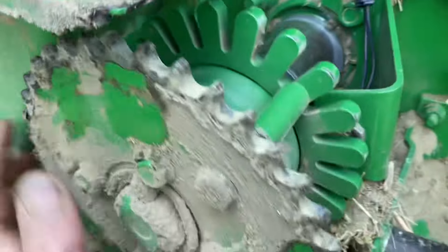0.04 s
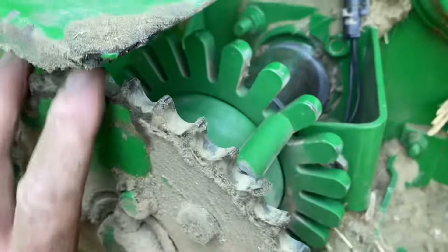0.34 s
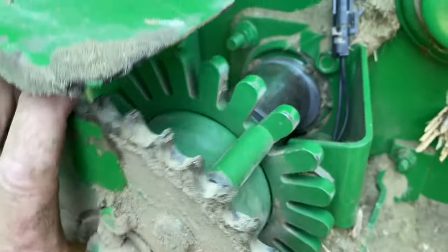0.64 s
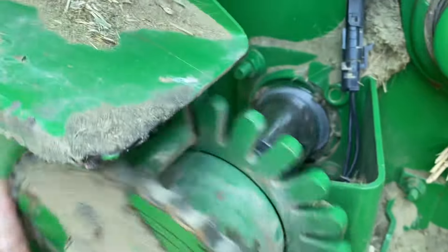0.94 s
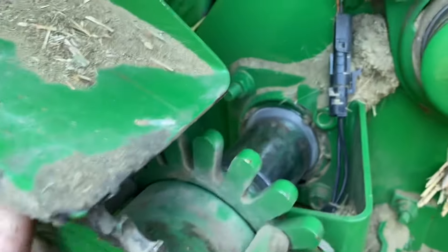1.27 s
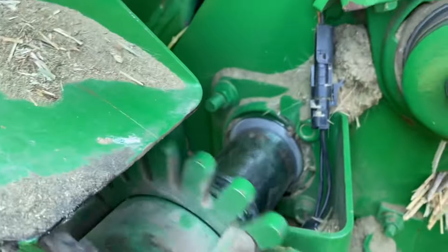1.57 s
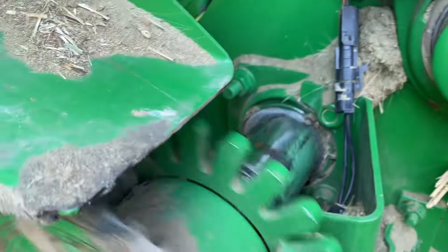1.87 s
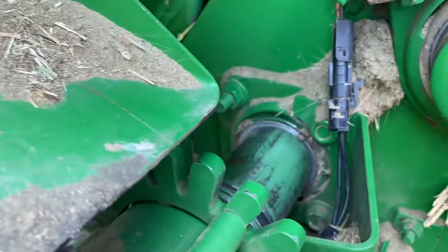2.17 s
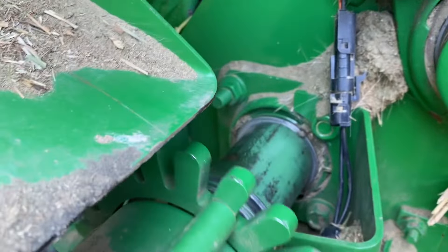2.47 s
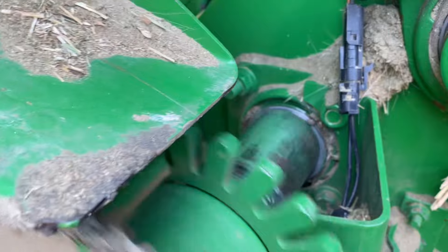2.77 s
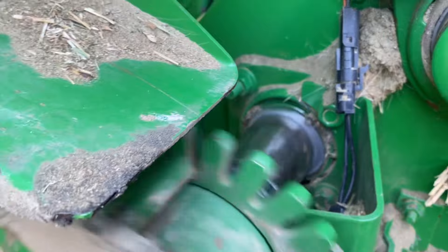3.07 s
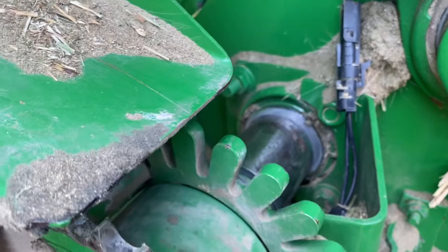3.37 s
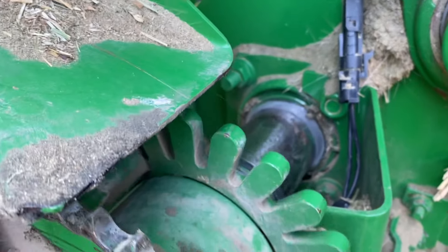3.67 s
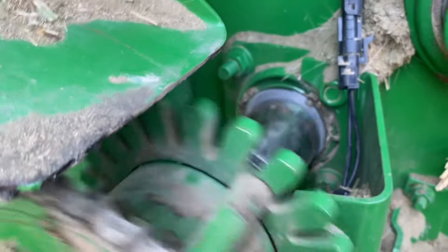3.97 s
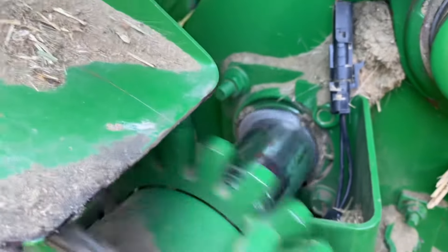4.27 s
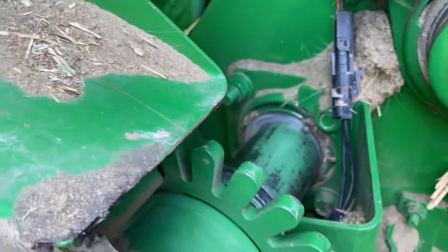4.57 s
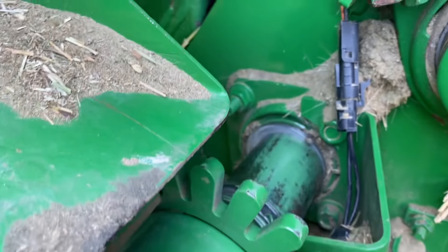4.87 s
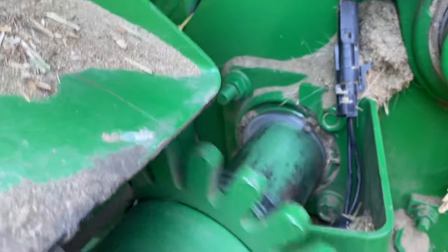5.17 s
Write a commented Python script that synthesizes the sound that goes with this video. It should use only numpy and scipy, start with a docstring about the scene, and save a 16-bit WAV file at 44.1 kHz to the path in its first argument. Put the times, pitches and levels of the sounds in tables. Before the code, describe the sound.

Dull taps and a light rub of skin on dusty steel open the sound, with the microphone right beside a farm machine in a quiet yard. A sprocket is then pushed back and forth by hand, and its rough bearing growls in five surges, coasting lower between them. Short steel clacks and fine grit accompany the turning, thin panels ring faintly, and the fourth surge brings two sharp metallic knocks.

```python
"""Soft hand bumps and rubbing, then a heavy rumble that swells five times, very close: a sprocket on a
farm machine is gripped and swung to and fro by hand. Its worn bearing growls through the steel housing,
louder and grittier with speed, while the frame shudders and thin guard panels sing on. Loose parts
clack as it turns, and two sharp knocks land in the fourth, hardest swing. Faint yard air lies behind."""
import sys
import numpy as np
from scipy import signal
from scipy.fft import rfft, irfft
from scipy.io import wavfile
from scipy.ndimage import uniform_filter1d

SR = 44100
rng = np.random.default_rng(int(sys.argv[2]) if len(sys.argv) > 2 else 0)


def persist_wave(psi):
    """Save psi, clipped to +-1, as 16-bit WAV."""
    counts = np.round(np.clip(psi, -1, 1) * 32767).astype(np.int16)
    wavfile.write(sys.argv[1], SR, np.atleast_2d(counts).T)


N = 234557

# Swings of the sprocket. Each row: start, speed-up, hold and slow-down in seconds, top speed from 0 to 1,
# share of that speed left for coasting, extra drone in dB, extra grit in dB.
SWINGS = [(0.658, .19, 0.18, 0.27, .53, 0.38, -3, 5), (1.542, 0.18, 0.13, 0.27, 0.94, .3, 1, -1),
          (2.523, 0.44, 0.07, .21, 1, .3, 2, -14), (3.819, 0.24, 0.33, 0.19, 0.94, 0.4, 0.5, -1.5),
          (5.106, .15, 0.088, .2, 0.78, 0.41, -5.5, -2.5)]
# Ring of the loose steel parts. Each row: pitch in Hz, level in dB, time to fall 60 dB in seconds.
STEEL_MODES = [(633, 3, 0.074), (1166, -5, 0.081), (1943, -4, 0.099), (2067, -7.5, 0.067),
               (2875, -10.5, 0.09), (3170, -14.5, 0.12), (3456, -11, 0.095), (3880, -11.5, 0.063),
               (4576, -4.5, 0.042), (4864, -5.5, 0.082), (5260, -9.5, 0.038), (6610, -22, 0.035),
               (7540, -8, 0.039)]
# Tone of a dry crack on steel. Each row: frequency in Hz, gain in dB.
CRACK_EQ = [(500, 2.5), (1500, -0.5), (3500, -3.5), (5200, -0.5), (5800, -4), (7200, 1.5), (9000, -9),
            (11500, -3.5), (15500, -8)]


def bearing(speed):
    """Balls drop into pits of the race, faster and harder with speed, shaking the housing and panels."""
    # Low and middle resonances of the housing, then the guard panels that sing on after a swing.
    # Each row: pitch in Hz, width in Hz, gain in dB.
    drone_modes = [(132.4, 27, 8.5), (146.4, 34, -11.5), (123, 14, -14.5), (200.8, 5.3, -16)]
    growl_modes = [(241, 36, -17.5), (292.7, 9.1, 0.5), (345.3, 5.2, 1), (395.8, 15, 5.5),
                   (463.5, 33, -7.5), (504.2, 34, -2), (573, 20, -2), (651.5, 10, 4), (659, 54, -1.5),
                   (730, 12, 2.5), (745, 6.8, 2), (825, 6.3, 9.5), (912, 16, -18), (984, 7.5, -13.5),
                   (1083, 34, 0.5), (1138, 14, 5.5), (1201, 10, 6.5), (1322, 39, -0.5), (1373, 21.5, 0.5),
                   (1479, 17, 0.5), (1723, 19, 3.5)]
    panel_modes = [(301.5, 3, -7), (813, 2, 0), (852, 2.5, 0), (905, 3, -4), (948, 2, 1), (954, 2, 1),
                   (1042, 2, -8)]
    # Broad body of the growl. Each row: frequency in Hz, gain in dB.
    body_eq = [(100, -19), (190, -20), (260, 8), (400, 6.5), (480, -8), (750, -6.5), (1050, -14.5),
               (1500, -50.5), (2200, -23), (4000, -69.5)]
    t = np.arange(N) / SR
    pits_per_s = 250 + 1200 * speed
    pits = impacts(pits_per_s, spread_db=0)

    lagged_speed = np.interp(t - .03, t, speed)  # the housing takes a moment to build up
    extra_drone_db, _ = swing_accents()
    drone_db = speed_db(lagged_speed, full_db=-31.5, tenfold_db=31.6) + extra_drone_db
    drone = resonate(stereo(pits, side_db=-13, left_db=-.8), drone_modes)
    drone = steady(resonate(drone, [(140, 150, 0)]), span=.07) * amp(drone_db)

    # the bass sits near the centre, the mids spread wider
    side = colour(pits[1:], [(200, -13.5), (700, -2.5)])[0]
    blows = stereo([pits[0], side], side_db=1.5, left_db=1.5)
    dull_blows = colour(blows, [(100, -29), (230, 14.5), (1600, -17), (2600, -24.5)])
    housing = unit(resonate(dull_blows, growl_modes))
    body = unit(colour(stereo(impacts(pits_per_s, spread_db=3), side_db=-21, left_db=-1.5), body_eq))
    growl_db = speed_db(speed, full_db=-38, tenfold_db=42.9)
    growl = steady(housing + speed ** .22 * body, span=.08) * amp(growl_db)
    # the growl sounds duller above about 1 kHz when the sprocket turns slowly
    lows = signal.sosfiltfilt(signal.butter(8, 1050, fs=SR, output="sos"), growl)
    growl = lows + (.41 + .65 * speed) * (growl - lows)

    panels = resonate(blows * amp(growl_db / 2), panel_modes)
    panels = unit(resonate(panels, [(896, 500, -19.5), (305, 80, 29)]))
    turning = np.interp(t, [.62, .76], [.25, 1])  # until the first swing it is only being gripped
    return turning * (drone + growl) + amp(-66.5) * panels


def pushed_speed(creep=.091):
    """Each swing speeds the sprocket up, holds it and brakes it; in between it barely creeps."""
    swings = [top * swell(start, rise, hold, fall) for start, rise, hold, fall, top, *_ in SWINGS]
    return np.maximum(creep, np.max(swings, axis=0))


def coasting_speed(decay_s=1.):
    """After each swing the sprocket runs on slowly and dies away."""
    t, speed = np.arange(N) / SR, 0
    for start, rise, hold, _, top, share, *_ in SWINGS:
        since = t - start - rise - hold
        speed = np.maximum(speed, top * share * (since > 0) * np.exp(-np.abs(since) / decay_s))
    return speed


def swing_accents():
    """Extra drone and grit in dB, gliding from one swing to the next."""
    start, rise, *_, drone_db, grit_db = np.transpose(SWINGS)
    return [np.interp(np.arange(N) / SR, start + rise, db) for db in (drone_db, grit_db)]


def frame(speed):
    """The heavy frame trembles under the moving mass and shudders at every shove."""
    # The hand shoves or catches the sprocket. Each row: start in seconds, hold in seconds, level in dB.
    shoves = [(0.013, 0.1, -36), (0.537, 0.022, -42), (1.636, 0.34, -35), (2.235, 0.16, -49),
              (2.694, 0.033, -41), (2.943, 0.058, -37.5), (3.176, 0.19, -41.5), (3.685, 0.15, -38.5),
              (3.865, 0.073, -27), (4.21, 0.16, -30), (4.447, 0.016, -35.5), (4.717, 0.37, -42),
              (5.092, .2, -38.5)]
    # Deep tone of the frame. Each row: frequency in Hz, gain in dB.
    frame_eq = [(10, -51.5), (28, -28), (42, -9), (58, 2), (70, -2), (84, 4.5), (100, -3.5), (125, -16),
                (200, -20), (400, -71.5)]
    jolt_power = sum((amp(db) * swell(start, .024, hold, fall=.19)) ** 2 for start, hold, db in shoves)
    tremor = amp(speed_db(speed, full_db=-48, tenfold_db=8.1))
    shake = colour(stereo(rng.standard_normal((2, N)), side_db=-16, left_db=0), frame_eq)
    return steady(shake, span=.099) * np.sqrt(jolt_power + tremor ** 2)


def knocks():
    """Parts scrape together, meet with a thud and give a bright ring that is choked as they close."""
    # Each row: time in seconds, relative thud and ring levels in dB, pitch of the ring as a ratio.
    hits = [(4.222, -14.8, -18, 1.0), (4.4046, -17.8, -21.8, 1.012)]
    # The bright ring. Each row: pitch in Hz, level in dB, time to fall 60 dB in seconds.
    ring_modes = [(2778, 0, .047), (2600, -6, .018), (2380, -11, .018), (3360, -9, .042), (3930, -18, .012),
                  (1760, -7, .014), (7560, -29, .06), (8500, -18, .05)]
    out, t = np.zeros((2, N)), np.arange(SR // 10) / SR
    for start, thud_db, ring_db, pitch in hits:
        scrape = unit(resonate(rng.standard_normal(len(t)), [(3320, 320, .46), (7900, 100, -2.6)]))
        lead_in = np.exp((t - t[-1]) / .018)
        add(out, start - t[-1], amp(-47.5) * scrape * lead_in)
        thud = (-push(t, hz=704, cycles=.95) + .6 * push(t, hz=1254, cycles=.84)
                + .31 * push(t, hz=2330, cycles=.94))
        choked = (1 - np.exp(-t / .0006)) / (1 + (t / .013) ** 8)
        bright = ring(t * pitch, ring_modes, detune=.002) * choked
        knock = amp(thud_db - 2) * thud + amp(ring_db - 3) * bright
        phase_lead = -signal.hilbert(knock).imag  # the near ear hears it a little ahead of the far one
        add(out, start, stereo([knock, phase_lead], side_db=-6, left_db=4))
    return out


def clacks():
    """A loose part slides over its play and chatters to rest, ringing the steel around it."""
    # Each row: time in seconds, relative level in dB, gains of the low and the high ring in dB.
    hits = [(0.551, -67, -11, -2), (0.9504, -31, -6, 2), (0.9652, -26.5, -0.5, 3.5),
            (1.112, -47.5, 4.5, -17), (1.6502, -51, 2.5, 10.5), (1.695, -45, 5, 1),
            (1.7185, -28.5, -2.5, 1.5), (1.9666, -29.5, -5.5, -1.5), (2.303, -58, -23, -14),
            (2.8653, -31.5, 3, 0.5), (2.9387, -40.5, 4, -1), (3.1152, -32.5, 2, 1.5), (3.1294, -41, 10, -6),
            (3.5867, -49, -23, -21), (3.8608, -46, -10, -13), (3.953, -37, -10, -22),
            (4.0656, -30.5, -5.5, -1), (4.2904, -31.5, 0, 5), (4.565, -58, -7, -11),
            (4.6254, -56, -18, -17), (4.776, -66, 1.5, -8), (5.2106, -30, 0.5, -1), (5.276, -50.5, 1, 0)]
    out, t = np.zeros((2, N)), np.arange(SR // 6) / SR
    chatter = (1 - np.exp(-t / .0021)) * (np.exp(-t / .0062) + .056 * np.exp(-t / .069))
    build_up = 1 - np.exp(-t / .002)
    for start, db, low_db, high_db in hits:
        noise = stereo(rng.standard_normal((2, len(t))), side_db=-10.5, left_db=0)
        crack = colour(noise * chatter, CRACK_EQ)
        # each blow lands elsewhere and favours other modes
        modes = [(hz, mode_db + (low_db if hz < 2500 else high_db) + 2.5 * rng.standard_normal(), t60)
                 for hz, mode_db, t60 in STEEL_MODES]
        steel = stereo([ring(t, modes, detune=.002), ring(t, modes, detune=.006)], side_db=-8, left_db=3)
        add(out, start, amp(db) * (amp(-2.5) * crack + amp(-12.5) * steel * build_up))
    return out


def hand_bumps():
    """Flesh meets something solid: a dull tap, and a boom that is deeper the softer the contact."""
    # Each row: time in seconds, relative boom and tap levels in dB, tap pitch in Hz.
    bumps = [(0.004, -37, -39.5, 222), (0.027, -40, -40, 280), (0.061, -32, -26, 310),
             (0.072, -20.5, -26.5, 318), (0.0868, -27, -22, 365), (0.097, -47, -23, 343),
             (0.108, -29, -28, 182), (0.12, -29, -32, 218), (0.164, -32, -27, 220),
             (0.202, -42, -31.5, 220), (0.21, -23, -32.5, 298), (0.222, -29.5, -33.5, 250),
             (0.318, -42, -46, 264), (0.422, -60, -40.5, 257), (0.431, -51, -42, 275),
             (0.601, -45, -48.5, 230), (0.619, -45, -46, 192), (2.184, -58, -37.5, 144),
             (3.751, -30.5, -40, 150), (3.802, -31, -38.5, 157), (4.136, -22, -45.5, 140),
             (4.3, -52, -25.5, 360), (4.314, -17.5, -36, 142), (4.713, -31, -40.5, 173),
             (5.278, -34, -34, 430)]
    # The frame booms for a moment. Each row: pitch in Hz, width in Hz, gain in dB.
    boom_modes = [(114.8, 30, 5.5), (286, 17, -8.5)]
    out, t = np.zeros((2, N)), np.arange(SR // 8) / SR
    for start, boom_db, tap_db, tap_hz in bumps:
        boom = amp(boom_db - 1) * push(t, hz=.55 * tap_hz, cycles=.69)
        tap = amp(tap_db + 5) * push(t, hz=tap_hz, cycles=.85)
        add(out, start, boom + tap)
    out += resonate(out, boom_modes)
    return colour(out, [(20, -8), (50, 5), (130, -1), (800, -4.5), (1300, -9.5)])


def friction(speed):
    """Dirt crackles in the race and scrapes the steel, and skin rubs with a fine hiss."""
    # Tone of the dirt and of the skin. Each row: frequency in Hz, gain in dB.
    grit_eq = [(700, 13.5), (1400, 16), (2000, 11.5), (2600, 14.5), (3400, 11.5), (4200, 9.5), (5000, -17),
               (5800, -6.5), (7200, -11.5), (9000, -46), (16000, -27)]
    skin_eq = [(1000, -15), (3000, -9), (5500, -7), (7200, -1.5), (9000, -9), (11500, 1), (13000, -3),
               (15500, 0.5)]
    grit_gain, hiss_gain = friction_gains(speed)
    grit = unit(colour(stereo(impacts(5000, spread_db=-2.5), side_db=-1, left_db=1.5), grit_eq))
    drag = stereo(impacts(810, spread_db=-2.5), side_db=-11.5, left_db=7)
    # the contact wanders, so each bright resonance catches in its own short spells
    scrape = sum(resonate(drag * amp(5 * waver(30)), [(hz, 120, 0)]) for hz, _, _ in STEEL_MODES[2:])
    hiss = unit(colour(stereo(impacts(7000, spread_db=-2), side_db=-11, left_db=.2), skin_eq))
    dirt = amp(-1.5) * grit + amp(-7) * unit(scrape) + amp(-14.5) * grain_ticks(count=160)
    return grit_gain * dirt + hiss_gain * amp(6) * hiss


def friction_gains(speed):
    """Grit and hiss grow with speed and with each stroke of the hand; the hiss also flutters."""
    # Skin strokes dusty steel. Each row: middle and length in seconds, relative grit and hiss in dB.
    strokes = [(.0, 0.067, -64, -65.5), (0.158, 0.071, -61.5, -60), (0.238, 0.14, -79, -65.5),
               (0.364, 0.02, -72, -69), (0.52, 0.75, -84, -76), (0.559, 0.018, -85, -58),
               (0.82, 0.22, -80, -77), (1.29, 0.15, -77, -65.5), (1.413, 0.18, -79, -71),
               (2.046, 0.061, -70, -65), (2.25, 0.066, -72.5, -75), (2.35, 0.079, -86, -68),
               (2.65, 0.17, -66.5, -82), (3.265, 0.031, -60.5, -60.5), (3.52, .06, -72.5, -71.5),
               (3.641, 0.058, -79, -62), (3.757, 0.089, -75, -72), (3.899, 0.091, -62.5, -69.5),
               (4.213, 0.068, -45.5, -53.5), (4.408, 0.046, -50.5, -60), (4.548, 0.047, -88, -88),
               (4.713, 0.032, -72, -77), (4.828, 0.034, -69.5, -71), (5.116, 0.096, -72, -93)]
    _, extra_grit_db = swing_accents()
    grit = amp(speed_db(speed, full_db=-57.5, tenfold_db=26.4) + extra_grit_db)
    hiss = amp(speed_db(speed, full_db=-65.5, tenfold_db=17.6))
    for middle, length, grit_db, hiss_db in strokes:
        stroke = hump(middle, length)
        grit = np.hypot(grit, amp(grit_db) * stroke)
        hiss = np.hypot(hiss, amp(hiss_db) * stroke)
    rustle = amp(2.5 * (1.5 - speed) * waver(14))  # skin rustles most when it moves slowly
    return grit, hiss * rustle


def grain_ticks(count):
    """Coarser grains are crushed, each with a short dry tick."""
    out, t = np.zeros((2, N)), np.arange(SR // 100) / SR
    for start, db in zip(rng.random(count) * N / SR, 4 * rng.standard_normal(count)):
        add(out, start, amp(db) * np.exp(-t / .0015) * rng.standard_normal((2, len(t))))
    return unit(colour(stereo(out, side_db=-1.5, left_db=-1), CRACK_EQ))


def shaft_squeak(middle_s=.45, length_s=.14, middle_hz=4800, fall_hz_per_s=4200):
    """The gripped shaft creeps in its seal with a faint, broken, falling tone."""
    since = np.clip(np.arange(N) / SR - middle_s, -2 * length_s, 2 * length_s)
    hz = (middle_hz - fall_hz_per_s * since) * (1 + .012 * waver(180))
    gain = amp(-87 + 4 * waver(40)) * hump(middle_s, length_s)
    return gain * np.sin(2 * np.pi * np.cumsum(hz) / SR)


def yard_air():
    """Faint steady air around the machine."""
    # Dark tone of the air. Each row: frequency in Hz, gain in dB.
    air_eq = [(30, -15), (80, 6), (200, 0.5), (400, -12), (650, -13), (900, -27), (1150, -43),
              (3000, -38.5), (15000, -50)]
    return amp(-64) * unit(colour(stereo(rng.standard_normal((2, N)), side_db=-1.5, left_db=4), air_eq))


def impacts(rate, spread_db):
    """Two trains of tiny random impacts of uneven size, rate a second; rms 1."""
    chance = np.clip(rate / SR, 1e-4, 1)
    sizes = rng.standard_normal((2, N)) * amp(spread_db * rng.standard_normal((2, N)))
    return unit((rng.random((2, N)) < chance) * sizes / np.sqrt(chance))


def ring(t, modes, detune):
    """Free ringing of modes (Hz, dB, t60 s), tuned a little differently on every blow."""
    return sum(amp(db - 60 * t / t60) * np.sin(2 * np.pi * hz * (1 + detune * rng.standard_normal()) * t)
               for hz, db, t60 in modes)


def push(t, hz, cycles):
    """A padded contact: a wave at hz that swells for so many cycles and dies quickly."""
    progress = t * hz / cycles
    return (progress * np.exp(1 - progress)) ** 4 * np.cos(2 * np.pi * (hz * t - cycles))


def resonate(x, modes):
    """Sum of resonances (Hz, width Hz, dB)."""
    return sum(amp(db) * signal.lfilter(*signal.iirpeak(hz, hz / width, SR), x)
               for hz, width, db in modes)


def colour(x, points, size=8192):
    """Minimum-phase EQ through (Hz, dB) points."""
    hz, db = np.transpose(points)
    bin_hz = np.arange(size // 2 + 1) * SR / size
    log_gain = np.log(amp(np.interp(np.log(bin_hz + 1), np.log(hz), db)))
    cepstrum = irfft(log_gain)[:size // 2]
    cepstrum[0] /= 2
    response = irfft(np.exp(rfft(2 * cepstrum, size)))
    return signal.fftconvolve(x, response[None], axes=1)[:, :x.shape[1]]


def stereo(pair, side_db, left_db):
    """Turn a mid and a side signal into two channels, leaning left by left_db."""
    both = pair[0] + amp(side_db) * pair[1] * np.array([[1], [-1]])
    return both * amp(np.array([[left_db], [-left_db]]) / 2)


def speed_db(speed, full_db, tenfold_db):
    """Level that reaches full_db at speed 1 and gains tenfold_db for ten times the speed."""
    return full_db + tenfold_db * np.log10(speed)


def swell(start, rise, hold, fall):
    """From a quarter to full in rise seconds, a hold, then back to a quarter in fall seconds."""
    t = np.arange(N) / SR - start
    return .25 ** np.maximum(np.maximum(1 - t / rise, (t - rise - hold) / fall), 0)


def hump(middle, length):
    """A smooth rise and fall, length seconds wide at half height."""
    return .5 ** ((2 * (np.arange(N) / SR - middle) / length) ** 2)


def waver(rate):
    """Random drift that turns rate times a second; rms 1."""
    return unit(np.interp(np.arange(N) / SR * rate, np.arange(1024), rng.standard_normal(1024)))


def steady(x, span):
    """Even out level swings slower than span seconds; rms 1."""
    power = uniform_filter1d(np.mean(x ** 2, axis=0), int(span * SR))
    return x / np.sqrt(uniform_filter1d(power, int(span * SR / 2)) + 1e-18)


def amp(db):
    """Decibels to gain."""
    return 10 ** (np.asarray(db) / 20)


def unit(x):
    """Scale to rms 1."""
    return x / np.sqrt(np.mean(x ** 2))


def add(out, start, sound):
    """Mix a sound in at start seconds."""
    i = max(int(start * SR), 0)
    out[:, i:i + sound.shape[-1]] += sound[..., :N - i]


def scene():
    """The rumble carries on as the sprocket coasts; the friction falls back when the hand lets go."""
    pushed = pushed_speed()
    speed = np.maximum(pushed, coasting_speed())
    machine = bearing(speed) + frame(speed) + friction(pushed) + shaft_squeak()
    return machine + hand_bumps() + clacks() + knocks() + yard_air()


def record(dry, top_hz=15700):
    """The left microphone port turns the phase of its treble; both channels lose the very top."""
    # Bands where the port flips the phase. Each row: centre in Hz, width in Hz.
    port_bands = [(8950, 1500), (13200, 1700)]
    left, right = dry
    for hz, width in port_bands:
        left = left - 2 * resonate(left, [(hz, width, 0)])
    return signal.sosfilt(signal.ellip(10, .2, 80, top_hz, fs=SR, output="sos"), [left, right])


dry = scene()
out = record(dry)
persist_wave(out)
```